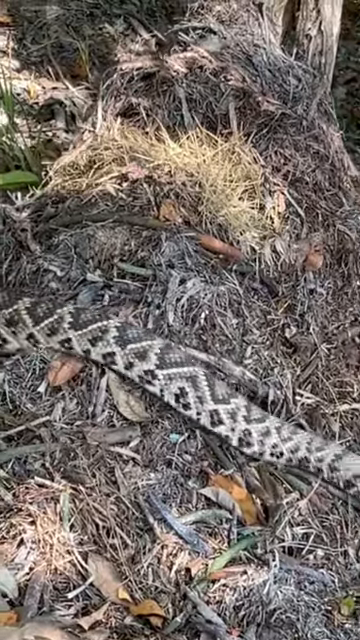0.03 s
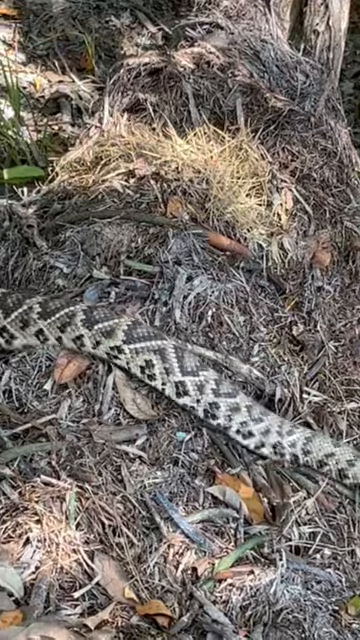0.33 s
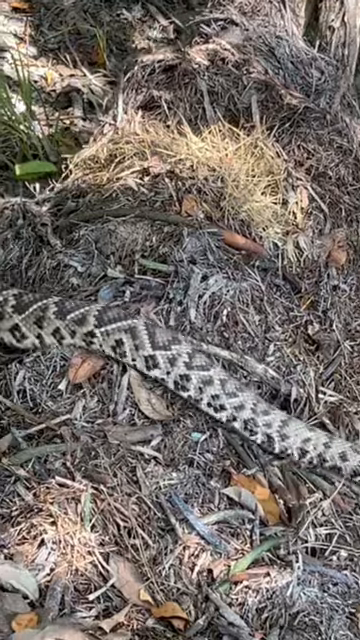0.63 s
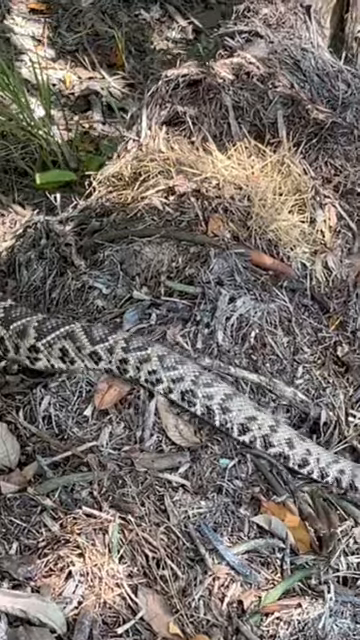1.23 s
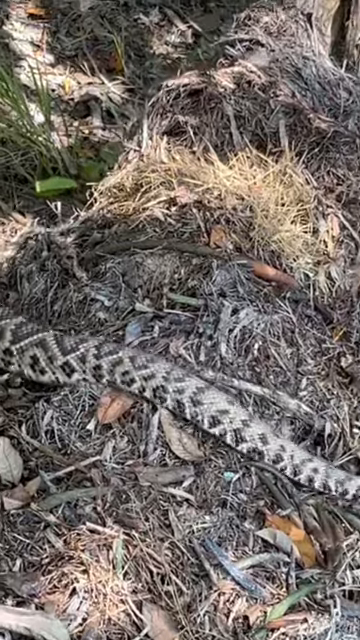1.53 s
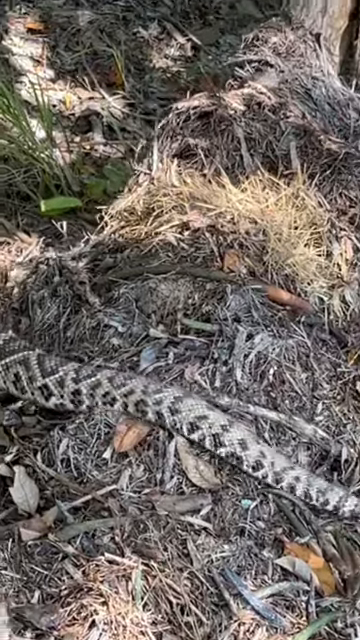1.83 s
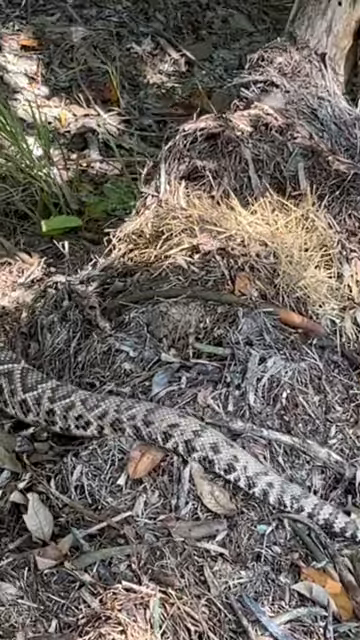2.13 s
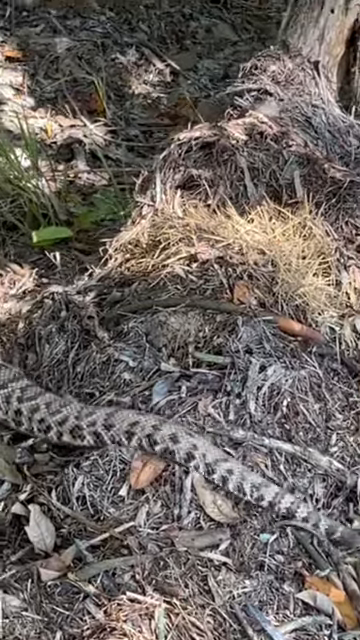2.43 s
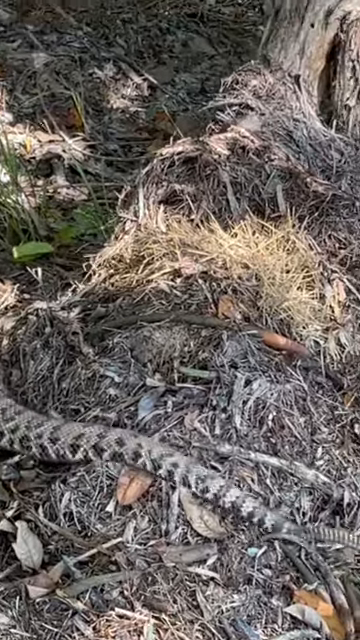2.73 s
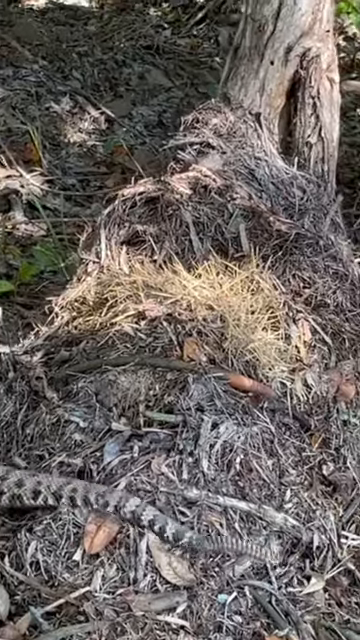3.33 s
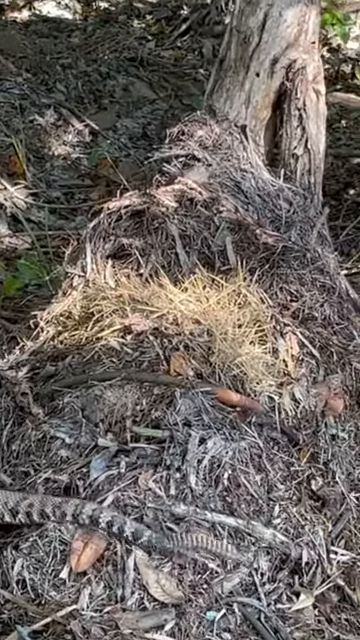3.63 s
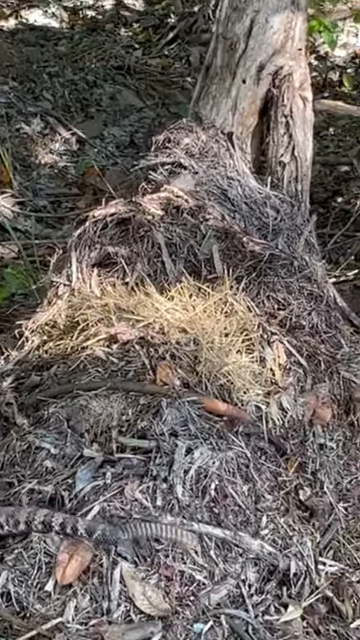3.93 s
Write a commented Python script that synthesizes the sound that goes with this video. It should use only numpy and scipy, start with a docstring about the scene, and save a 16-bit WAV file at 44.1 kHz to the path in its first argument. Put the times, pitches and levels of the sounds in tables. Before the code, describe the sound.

A snake slides over dry leaves close by, with faint scraping and fine crackles. A few soft hollow knocks come near the start, and the rustling grows louder with small twig snaps toward the end, over a low outdoor drone.

```python
"""A snake slides over dry leaves, close by: its scales scrape and set off a fine crackle.
The scrape is shaped noise and the crackle is many tiny clicks. Some leaves and twigs snap, each a burst
of noise with a brief ring. Near the start come a few soft hollow knocks, thumps that drop in pitch.
Behind it all lie a low wavering drone, like a far engine, and faint outdoor air."""
import sys
import numpy as np
from scipy import signal
from scipy.fft import rfft, irfft
from scipy.io import wavfile
from scipy.ndimage import uniform_filter1d

SR = 44100
rng = np.random.default_rng(int(sys.argv[2]) if len(sys.argv) > 2 else 0)


def generate_wav(signal):
    """Clip the signal to [-1, 1] and save it as 16-bit WAV at the path in sys.argv[1]."""
    frames = np.transpose(np.atleast_2d(signal))
    scaled = np.clip(frames, -1, 1) * 32767
    pcm = np.round(scaled).astype(np.int16)
    wavfile.write(sys.argv[1], SR, pcm)


N = 176400


def amp(db):
    """Turns decibels into a number to multiply by."""
    return 10 ** (np.asarray(db) / 20)


def unit(x):
    """Scales a signal to an average strength (rms) of 1."""
    return x / np.sqrt(np.mean(x ** 2) + 1e-20)


def fade(t, fade_s):
    """A smooth dying away; a fade time is how long it takes to drop by 60 dB."""
    return amp(-60 * t / fade_s)


def bins():
    """The frequencies in the spectrum of a full-length signal."""
    return np.fft.rfftfreq(N, 1 / SR)


def read(points, hz):
    """Looks up frequencies in a table, blending between rows by musical pitch."""
    f, value = np.transpose(points)
    return np.interp(np.log(hz + 1), np.log(f + 1), value)


def curve(rows):
    """Turns each column of a time table into one value per sample."""
    s, *columns = np.transpose(rows)
    return [np.interp(np.arange(N) / SR, s, c) for c in columns]


def add(mix, s, sound):
    """Mixes a sound in, starting at s seconds."""
    part = mix[round(s * SR):][:len(sound)]
    part += sound[:len(part)]


def drift(rate_hz):
    """A random wobble of strength 1, mostly slower than rate_hz."""
    return unit(irfft(rfft(rng.standard_normal(N)) * np.exp(-(bins() / rate_hz) ** 2), N))


def patchy(x, depth_db, bands, frames):
    """Makes random patches of pitch and time a little louder or softer."""
    spectra = signal.stft(x, nperseg=512)[2]
    patches = uniform_filter1d(rng.standard_normal(spectra.shape[1:]), bands, axis=0)
    patches = unit(uniform_filter1d(patches, frames, axis=1))
    return signal.istft(spectra * amp(depth_db * patches), nperseg=512)[1][:, :N]


def spread(pair, colour, likeness, lead):
    """Blends two unrelated noises into left and right, and sets their colour (level at each pitch)."""
    hz, (left, other) = bins(), rfft(pair)
    same = np.clip(read(likeness, hz), 0, 1)
    right = (same * left + np.sqrt(1 - same ** 2) * other) * np.exp(-1j * read(lead, hz))
    return unit(irfft(np.array([left, right]) * amp(read(colour, hz)), N))


def sides(balance_db, lead):
    """Left and right gains: the left is louder by balance_db and ahead by lead radians."""
    side = np.array([[.5], [-.5]])
    return amp(side * balance_db) * np.exp(1j * side * lead)


def resonance(colour):
    """Makes a filter from a colour table that rings only after a blow, never before it."""
    log_gain = np.log(amp(read(colour, abs(np.fft.fftfreq(N, 1 / SR)))))
    return np.exp(np.conj(signal.hilbert(log_gain)))[:len(bins())]


def click(hz, ring, fade_s):
    """A small piece gives way: a burst of noise and a brief ring, with a total energy of 1."""
    t = np.arange(0, .03, 1 / SR)
    crack = rng.standard_normal(len(t)) * fade(t, fade_s)
    tone = np.sin(2 * np.pi * hz * t) * fade(t, fade_s)
    sound = crack / np.linalg.norm(crack) + ring * tone / np.linalg.norm(tone)
    return sound / np.linalg.norm(sound)


def crackle(density, pitches=30):
    """Needles and leaf edges give tiny clicks of uneven size, 1300 a second when density is 1."""
    out = np.zeros(N)
    for hz in np.geomspace(1200, 14000, pitches):
        size = amp(np.minimum(rng.exponential(1, N), 4))
        hits = size * (rng.random(N) < density * 1300 / pitches / SR)
        out += signal.oaconvolve(hits, click(hz, ring=1.32 * np.sqrt(hz / 14000), fade_s=.0018))[:N]
    return unit(out / np.sqrt(density))  # more clicks, but no louder


def slither():
    """Scales scrape the dry leaves; harder rubbing is louder and sets off more crackle."""
    # how hard the snake rubs (time [s], level [dB], boost of the lower tones [dB])
    rubbing = [(0, -73, 18.5), (.13, -75.5, 14.5), (.2, -67, 10.5), (.3, -70.5, 13.5), (.56, -72.5, 15),
               (.82, -72.5, -20), (1.06, -68, 1), (1.38, -72, 10.5), (1.455, -62, 4.5), (1.5, -66, 4),
               (1.56, -65.5, 12), (1.588, -62, 6), (1.606, -56, 5), (1.626, -61, 10.5), (1.65, -58, 12.5),
               (1.695, -63, 1), (1.78, -71.5, -23), (1.93, -69, -6), (2.13, -73.5, -10), (2.34, -70, -10),
               (2.47, -72, -12), (2.58, -62, 5), (2.655, -60.5, -6), (2.68, -54.5, 1.5), (2.712, -57, 0),
               (2.74, -58.5, -4), (2.79, -62.5, -11), (2.86, -62, 8), (2.91, -67.5, -10),
               (2.975, -66.5, -6), (3.015, -54, 5.5), (3.04, -53, 4), (3.065, -52, -3), (3.1, -46.5, 1.5),
               (3.118, -50.5, -4), (3.155, -44.5, 1.5), (3.19, -44, -0.5), (3.225, -48, -3.5),
               (3.25, -53, -1), (3.39, -55.5, -7), (3.51, -65, -3), (3.55, -56.5, -4), (3.59, -62, -22),
               (3.65, -53.5, -9), (3.71, -64.5, -7), (3.85, -73, 5), (4, -63.5, -5)]
    # colour of the rustle (frequency [Hz], level [dB])
    colour = [(100, -48), (300, -12), (460, -4), (650, -1), (850, -4.5), (1250, -4.5), (1450, -2),
              (1620, -4.5), (1830, -1.5), (2050, -4.5), (2300, -3), (2650, -4), (3100, -2), (3600, -1),
              (4200, -2), (4900, -0.5), (6200, -4), (8500, -5.5), (12000, -10), (15500, -10.5)]
    # how alike left and right are (frequency [Hz], likeness [0-1])
    likeness = [(300, 0.69), (1400, 1), (2000, 1), (3200, 0.99)]
    # how far the left side is ahead (frequency [Hz], lead [radians])
    lead = [(300, -1.1), (700, -1.8), (900, -0.092), (1400, 1), (1800, 0.87), (3000, 0.6), (3700, 0.026)]
    level_db, body_db = curve(rubbing)
    density = amp(.5 * (level_db + 59.5))
    pair = [amp(.1 + 2 * drift(78)) * rng.standard_normal(N) + crackle(density) for _ in range(2)]
    uneven = patchy(np.array(pair), depth_db=2, bands=5, frames=4)
    catching = amp(1.34 * drift(rate_hz=92))  # the scales stick and slip
    rustle = spread(uneven * catching, colour, likeness, lead)
    body = irfft(rfft(rustle) / (1 + (bins() / 1990) ** 4), N)  # the part below about 2 kHz
    return amp(level_db + 4) * (rustle + (amp(body_db) - 1) * body)


def drone():
    """A far, low drone wavers on its way through the air; its lowest tone swells on its own."""
    # its tones (pitch [Hz], level [dB], pitch wobble [Hz], left lead [radians], share of swell [0-1])
    tones = [(81.3, -48, 2.626, -0.23, 1), (161, -56.5, 2.5, -1.06, 1), (247.2, -64, 4.1, -1.26, 0.34),
             (584.4, -66, 6.88, -1.5, 0.35), (1834, -79, 23, -0.35, 0.1)]
    # swell of the lowest tone (time [s], level [dB])
    low_swell = [(0, -11), (.2, -0.5), (.3, 7.5), (.4, -1), (.48, 2), (.6, -3.5), (.85, 2), (1.1, -3.5),
                 (1.48, 0), (1.57, -11), (1.7, 7.5), (1.85, -6), (1.94, 3.5), (2.05, -15.5), (2.2, -5),
                 (2.28, 10), (2.4, -3), (2.53, 7), (2.7, -9), (2.88, -5), (2.945, 7), (3.03, -8.5),
                 (3.17, 5.5), (3.3, -4.5), (3.4, 4.5), (3.5, -6.5), (3.6, 6.5), (3.7, -6), (3.82, 1.5),
                 (4, -10)]
    # swell of the higher tones (time [s], level [dB])
    high_swell = [(0, 1), (.1, 6), (.2, 1), (.3, 8), (.45, -3), (.6, -0.5), (1.25, -0.5), (1.45, -5.5),
                  (1.9, -0.5), (2.15, 1), (2.25, -10.5), (2.8, -5.5), (3.05, 2), (3.45, 1), (3.6, 3.5),
                  (4, -2.5)]
    out = np.zeros((2, N))
    for k, (hz, db, wobble_hz, lead, share) in enumerate(tones):
        swell_db = curve(high_swell if k else low_swell)[0]
        phase = 2 * np.pi * np.cumsum(hz + wobble_hz * drift(rate_hz=11.97)) / SR
        flutter_db = 2.08 * drift(rate_hz=19)
        out += amp(db - 1.5 + share * swell_db + flutter_db) * unit(np.sin([phase, phase - lead]))
    return out


def air():
    """Outdoor air: a distant rumble and hush, drifting in patches."""
    # colour of the air (frequency [Hz], level [dB])
    colour = [(15, -36), (28, -10), (40, -6.5), (62, 0), (90, -1.5), (115, -2.5), (138, -7.5), (190, -11.5),
              (260, -11.5), (330, -16.5), (430, -19), (500, -14), (600, -11.5), (720, -17.5), (900, -22.5),
              (1400, -18), (1650, -23), (1900, -25.5), (2300, -32), (3100, -39), (4800, -40.5), (8000, -46),
              (15000, -48)]
    # how alike left and right are (frequency [Hz], likeness [0-1])
    likeness = [(60, 0.96), (100, 0.96), (140, 0.85), (250, 0.82), (600, 0.97), (1100, 0.6), (1600, 1),
                (2000, 0.84), (3000, 1)]
    # how far the left side is ahead (frequency [Hz], lead [radians])
    lead = [(40, -0.5), (90, 0.35), (170, -0.22), (260, -0.92), (430, -1.55), (600, -2.5), (1100, -3),
            (1550, -3.5), (1800, 0.16), (2500, 0)]
    noise = patchy(rng.standard_normal((2, N)), depth_db=1.22, bands=3, frames=20)
    return amp(-48.5) * spread(noise, colour, likeness, lead)


def knocks():
    """Soft hollow knocks: each is a thump that drops quickly in pitch, a dull scuff and a short ring."""
    # the blows (time [s], level [dB], first pitch [Hz], time to halve the pitch [s], rise time [s],
    # fade time [s], ring level [dB])
    blows = [(0.307, -37, 1590, 0.0019, 0.00058, 0.017, -14),
             (0.3911, -29.5, 2450, .02, 0.00094, 0.0097, -18),
             (0.3956, -25.5, 2020, 0.00182, 0.00087, 0.016, -16),
             (0.4002, -30.5, 900, 0.0025, 0.00065, 0.015, -21),
             (0.414, -39, 1120, 0.014, 0.0012, 0.016, -11), (.4187, -22.5, 990, 0.014, 0.0019, 0.013, -22),
             (0.4557, -38, 1010, 0.005, 0.0011, 0.02, -21),
             (.4613, -25.5, 2916, 0.00082, 0.00025, 0.031, -15.5)]
    # tones that ring after a blow (pitch [Hz], level [dB], fade time [s])
    ring_tones = [(342, 2.5, 0.051), (515, 3, 0.053), (657, -0.5, 0.093), (897, -14, 0.072),
                  (1050, -5, 0.054)]
    # hollow colour of a knock (frequency [Hz], level [dB])
    colour = [(80, -1), (200, -1), (270, -7), (345, 3.5), (425, -7.5), (545, 6.5), (660, 0.5), (745, -3),
              (880, 3.5), (1150, -7.5), (1450, -6.5), (1750, -12.5), (2400, -9.5), (2850, -17.5),
              (3400, -8), (5000, -20)]
    # the high tones come from the right (frequency [Hz], left minus right [dB])
    balance = [(1000, 1.5), (1500, 4), (2000, -5), (2600, -12), (3300, -12)]
    out = np.zeros(N)
    t = np.arange(0, .1, 1 / SR)
    ring = sum(amp(db) * fade(t, fade_s) * np.sin(2 * np.pi * hz * t) for hz, db, fade_s in ring_tones)
    muffle = signal.butter(3, 2180, fs=SR, output="sos")
    for s, db, first_hz, fall_s, rise_s, fade_s, ring_db in blows:
        pitch_hz = first_hz / (1 + t / fall_s)
        thump = np.sin(2 * np.pi * np.cumsum(pitch_hz) / SR) * fade(t, fade_s)
        scuff = unit(signal.sosfilt(muffle, rng.standard_normal(len(t)))) * fade(t, .05)
        rise = np.minimum(t / rise_s, 1)
        add(out, s, amp(db) * rise * (thump + .26 * scuff + amp(ring_db) * ring))
    lead = 1.77 / (1 + (bins() / 2200) ** 8)  # the left is ahead below about 2200 Hz
    return irfft(rfft(out) * resonance(colour) * sides(read(balance, bins()), lead), N)


def snaps():
    """Single leaves and thin twigs break or spring back, each with one click."""
    # the snaps (time [s], level [dB], ring pitch [Hz], ring compared with crack [dB], fade time [s])
    breaks = [(0.346, -56, 7500, 2, .006), (.3700, -44, 4800, -0.5, 0.0049),
              (0.4227, -48, 12000, -21, 0.0041), (0.451, -51.5, 5870, -12, 0.0078),
              (0.4884, -46.5, 5460, -12, 0.014), (.645, -62, 7000, -16, 0.0045),
              (0.8916, -49, 5300, -8, 0.0033), (.754, -60, 5700, 0, .008), (.919, -53, 6000, -15, .004),
              (1.145, -54, 8900, -17, 0.0069), (1.448, -54, 5000, -12, .008), (1.574, -54, 4000, -6, .005),
              (1.604, -51, 4200, -3, .005), (1.644, -51, 1900, 7, .006), (1.697, -50, 4700, -3, .004),
              (1.752, -53.5, 9000, -11, 0.011), (1.966, -54.5, 4970, -5, .005),
              (2.334, -52, 4500, -2, 0.0038), (2.415, -55, 4580, 8, .005),
              (2.588, -48.5, 6000, -14, 0.0039), (2.675, -42, 5100, -2, 0.0036),
              (2.820, -44.5, 12400, -1, 0.0041), (2.951, -55, 4000, 1, .004),
              (3.007, -46, 10200, -1, 0.0067), (3.162, -34, 3930, 9, 0.0041),
              (3.194, -40, 4700, 10, 0.0069), (3.2276, -36.5, 5000, -8, 0.0055),
              (3.257, -46, 5030, 10, 0.0033), (3.2749, -37, 2970, 0, 0.0025),
              (3.2899, -38.5, 4200, 6, 0.0014), (3.317, -44, 5370, -2, .004),
              (3.405, -44.5, 5800, -7, 0.0032), (3.466, -46, 5970, -10, .004),
              (3.476, -42, 6430, -6, 0.0094), (3.533, -46, 5040, -18, 0.0048),
              (3.553, -50, 11500, -3, .004), (3.563, -32.5, 10900, 4.5, 0.0043),
              (3.628, -47, 10500, -8, 0.0043), (3.7136, -34.5, 6160, -5, 0.006),
              (3.7140, -43, 14200, 8, 0.0057), (3.7159, -37.5, 11800, -7, 0.0095),
              (3.7852, -52.5, 5900, 1, .006), (3.795, -55, 10500, -11, .004), (3.949, -57, 4800, -5, .005)]
    # colour of a snap (frequency [Hz], level [dB])
    colour = [(150, -1), (700, -7), (2000, -5), (5000, 0), (8500, 2.5), (11000, -6.5), (15500, -0.5)]
    out = np.zeros(N)
    for s, db, hz, ring_db, fade_s in breaks:
        add(out, s, amp(db + 20.5) * click(hz, amp(ring_db), fade_s))
    return irfft(rfft(out) * amp(read(colour, bins())), N)


def scatter(x):
    """Nearby leaves bounce each snap around, adding a faint, short tail."""
    t = np.arange(0, .12, 1 / SR)
    tail = rng.standard_normal(len(t)) * fade(t, fade_s=.11)
    return x + amp(-10) * signal.oaconvolve(x, tail / np.linalg.norm(tail))[:N]


def twigs():
    """Thicker twigs give one woody crack: the sudden break, then splinters and a brief ring."""
    # the cracks (time [s], level [dB], ring pitch [Hz], fade time [s])
    cracks = [(0.3694, -41, 1640, 0.022), (0.892, -42, 4120, 0.005)]
    break_s = .00006
    out = np.zeros(N)
    for s, db, hz, fade_s in cracks:
        splinters = click(hz, ring=.27, fade_s=fade_s)
        pulse = np.exp(-np.arange(len(splinters)) / SR / break_s)
        add(out, s, amp(db + 17) * (pulse / np.linalg.norm(pulse) + .49 * splinters))
    return signal.sosfilt(signal.butter(2, [400, 5400], "band", fs=SR, output="sos"), out)


def squeaks():
    """A stiff leaf sings as it is rubbed: noise in a band so narrow that it has a pitch."""
    # the squeaks (time [s], length [s], pitch [Hz], level [dB])
    rubs = [(2.808, 0.075, 6200, -63.5), (3.05, 0.045, 1840, -51)]
    width_hz = 160
    out = np.zeros(N)
    for s, length_s, hz, db in rubs:
        n = round(length_s * SR)
        band = np.exp(-((bins() - hz) / width_hz) ** 2)
        tone = unit(irfft(rfft(rng.standard_normal(N)) * band, N))
        add(out, s, amp(db) * tone[:n] * signal.windows.tukey(n))
    return out


def scene():
    """The snake and the knocks over the outdoor background."""
    return slither() + scatter(snaps() + squeaks() + twigs()) + knocks() + drone() + air()


def record(dry):
    """Two microphones shift timing and level between the sides; the deepest and highest tones are cut."""
    # how much louder the left microphone is (frequency [Hz], left minus right [dB])
    balance = [(450, 0), (850, -3), (1200, -2), (1550, -7.5), (1850, -8), (2100, -4), (2600, -1), (3100, 0)]
    # how far the left microphone is ahead (frequency [Hz], lead [radians])
    lead = [(5150, 0), (5600, -1), (6600, -.95), (7400, -2), (8000, -3.1), (8700, -3.2), (9200, -3.9),
            (10000, -4.7), (11100, -6.25), (13200, -6.3), (14000, -7.7), (15000, -9.2)]
    low_cut_hz, high_cut_hz = 34.5, 16200
    heard = irfft(rfft(dry) * sides(read(balance, bins()), read(lead, bins())), N)
    heard = signal.sosfilt(signal.butter(4, low_cut_hz, "high", fs=SR, output="sos"), heard)
    high_cut = signal.firwin(511, high_cut_hz, window=("kaiser", 9), fs=SR)
    return signal.oaconvolve(heard, high_cut[None], "same")


dry = scene()
out = record(dry)
generate_wav(out)
```